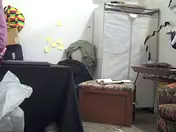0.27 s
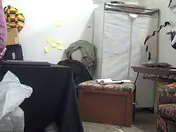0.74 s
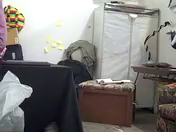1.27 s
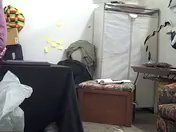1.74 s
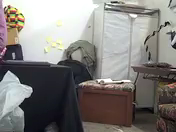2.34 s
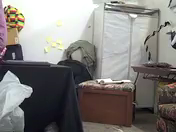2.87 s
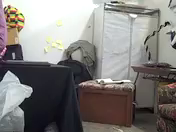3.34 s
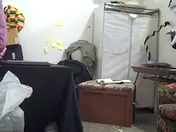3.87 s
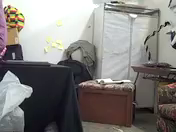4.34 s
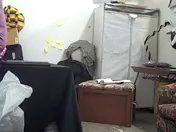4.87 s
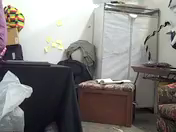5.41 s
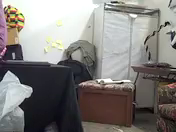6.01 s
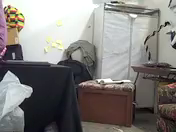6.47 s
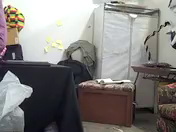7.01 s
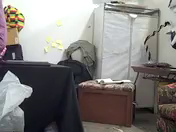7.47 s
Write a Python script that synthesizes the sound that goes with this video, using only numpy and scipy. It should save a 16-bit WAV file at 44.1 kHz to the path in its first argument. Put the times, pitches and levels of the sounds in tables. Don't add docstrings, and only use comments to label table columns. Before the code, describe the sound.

In a quiet cluttered room, someone unseen knocks on wood at irregular intervals. The first knocks are dull, as if round a corner; later ones are clear, hard and snappy. Every blow has a woody ring, a low thump, a slap off a far wall and a short boomy tail. The camera microphone is distant, band-limited and faintly hissy.

```python
import sys
import numpy as np
from scipy import signal
from scipy.fft import rfft, irfft, next_fast_len
from scipy.io import wavfile
from scipy.ndimage import uniform_filter1d

SR = 44100
rng = np.random.default_rng(int(sys.argv[2]) if len(sys.argv) > 2 else 0)


def transcribe(u):
    v = np.clip(np.atleast_2d(u).T, -1, 1)
    q = np.round(v * 32767).astype(np.int16)
    wavfile.write(sys.argv[1], SR, q)


def boost(x):
    u = np.asarray(x, float) / 20
    return 10 ** u


N = 341334
LENGTH = 3 * SR // 4

# [f/Hz, level/dB per Hz]
CORNER_ROOM = [(29, -69), (50, -15), (71, -16), (167, -5), (201, -4.5), (253, -15), (390, -16.5),
               (480, -12), (619, -8), (2770, -25), (4460, -21.5), (6490, -30.5), (7200, -42), (9360, -69.5),
               (15800, -120)]


def unit(x):
    return x / np.sqrt(np.mean(x ** 2) + 1e-20)


def along(points, hz):
    f, v = np.transpose(points)
    return np.interp(np.log(hz + 1), np.log(f + 1), v)


def filtered(x, response):
    m = next_fast_len(len(x) + 4096)
    hz = np.fft.rfftfreq(m, 1 / SR)
    return irfft(rfft(x, m) * response(hz), m)[:len(x)]


def swell(t, peak_s, rise_s, fall_s):
    return np.exp(np.where(t < peak_s, (t - peak_s) / rise_s, (peak_s - t) / fall_s))


def hiss():
    # [f/Hz, level/dB per Hz]
    hiss_spectrum = [(15, -47), (25, -6.5), (32, -6.5), (92, -12.5), (179, -2), (400, -18.5), (571, -9.5),
                     (627, -10.5), (814, -12), (916, -9.5), (1160, -13.5), (1370, -12), (3800, -23.5),
                     (6550, -30), (7200, -42), (9360, -75), (15800, -120)]
    z = signal.stft(rng.standard_normal(N), nperseg=512)[2]
    patches = uniform_filter1d(rng.standard_normal(z.shape), 5, 0)
    patches = uniform_filter1d(patches, 12, 1)
    noise = signal.istft(z * boost(0.9 * unit(patches)), nperseg=512)[1][:N]
    level_db = -51.5
    return boost(level_db) * unit(filtered(noise, lambda hz: boost(along(hiss_spectrum, hz))))


def dying(spectrum, early_db, late_db):
    # [f/Hz, t60/s]
    early_t60 = [(80, 0.05), (500, 0.098), (2000, 0.4), (6000, 0.057)]
    # [f/Hz, t60/s]
    late_t60 = [(80, 1), (200, 0.94), (560, 0.48), (1200, 0.55), (1800, 0.53), (2250, 0.68), (2800, 0.61),
                (4500, 0.57), (7000, 0.52)]
    noise = rng.standard_normal(LENGTH)
    noise = unit(filtered(noise, lambda hz: boost(along(spectrum, hz))))
    hz, t, z = signal.stft(noise, SR, nperseg=256)
    early = boost(early_db - 60 * t / along(early_t60, hz)[:, None])
    late = boost(late_db - 60 * t / along(late_t60, hz)[:, None])
    return signal.istft(z * np.hypot(early, late), SR, nperseg=256)[1][:LENGTH]


def ticks():
    # [t/s, level/dB]
    touches = [
        (0.057, -55),
        (0.5988, -46.5),
    ]
    out, t = np.zeros(N + LENGTH), np.arange(LENGTH) / SR
    for s, db in touches:
        touch = dying(CORNER_ROOM, db - 1.0, db - 14) * (1 - np.exp(-t / 0.0045))
        out[round(s * SR):][:LENGTH] += touch
    return out[:N]


def crack(t, start_hz, end_hz, sweep_s, rise_s):
    # [delay/s, level/dB]
    near_walls = [
        (.008, -6.5),
        (0.015, -16),
        (0.0264, -22.5),
    ]
    turns = end_hz * t + (start_hz - end_hz) * sweep_s * (1 - np.exp(-t / sweep_s))
    sweep = np.sin(2 * np.pi * turns) * swell(t, 3 * rise_s, rise_s, fall_s=0.0042)
    sweep *= np.clip((0.007 - t) / 0.001, 0, 1)
    out = sweep.copy()
    for s, db in near_walls:
        out += boost(db + rng.normal(0, 1.0)) * np.roll(sweep, round(s * SR))
    return out


def panel_ring(t, modes, lead_s, rest_s, rest_db):
    ring = np.zeros(LENGTH)
    for hz, level_db, t60, delay in modes:
        u = np.maximum(t - lead_s - delay, 0)
        strength = boost(level_db + 2.2 * rng.normal() - 60 * u / t60)
        tone = np.sin(-2 * np.pi * hz * rng.normal(1, 0.0084) * u)
        ring += strength * tone * (1 - np.exp(-u * hz / 0.99))
    return ring * boost(rest_db / (1 + np.exp((rest_s - t) / 0.0015)))


def floor_thump(t, thumps):
    out = np.zeros(LENGTH)
    for delay, level_db in thumps:
        out -= boost(level_db + rng.normal(0, 1.5)) * np.exp(-((t - delay) / 0.00025) ** 2)
    return out


def room_answer(t, usual, fresh, rise_s, lag_s, shade, slap_s):
    answer = (0.9 * usual + 0.44 * fresh) * (1 - np.exp(-(t / rise_s) ** 2))
    answer = filtered(answer, lambda f: np.exp(-2j * np.pi * lag_s * 300 * np.log(1 + f / 300)))
    treble = filtered(answer, lambda f: f ** 4 / (f ** 4 + 1600 ** 4))
    return answer - shade * np.exp(-(t / slap_s) ** 4) * treble


def far_wall_slap(t, slap_db, spread_db, slap_s):
    # [f/Hz, width/Hz, level/dB]
    resonances = [(3070, 98, 8.5), (3280, 110, 6.5), (3540, 260, 3), (4730, 240, 3), (4750, 130, -9.5),
                  (2225, 410, -15)]

    def wall(f):
        response = boost(spread_db) * np.exp(-(np.log(f / 4000 + 1e-6) / 0.5) ** 2)
        for k, (centre, width, db) in enumerate(resonances):
            peak = 1j * f * width / (centre * centre - f * f + 1j * f * width)
            response = response + (-1) ** k * boost(db) * peak
        return response

    burst = unit(filtered(rng.standard_normal(LENGTH), wall))
    return boost(slap_db) * swell(t, slap_s, rise_s=0.011, fall_s=0.0014) * burst


def room_boom(t, boom_db, boom_s):
    u = np.maximum(t - boom_s, 0)
    tone = np.sin(2 * np.pi * 205 * rng.normal(1, 0.065) * u)
    return boost(boom_db - 60 * u / 0.14) * tone * (1 - np.exp(-u / 0.0013))


def knocks(blows, edge, modes, room, thumps, before_s, lead_s, crack_db, crack_hz, ring_db, rest_s, rest_db,
           shade, early_db, late_db, rise_s, lag_s, slap_db, spread_db, slap_s, boom_db, boom_s):
    colour_hz = [110, 290, 700, 2200, 5000]
    out, t = np.zeros(N + LENGTH), np.arange(LENGTH) / SR
    usual = dying(room, early_db, late_db)
    for s, db, bass_db, treble_db in blows:
        edge_db = edge[0] + edge[1] * treble_db
        ring = panel_ring(t, modes, lead_s, rest_s, rest_db)
        start_hz = crack_hz * rng.normal(1, 0.053)
        first = boost(crack_db) * crack(t, start_hz, 0.34 * crack_hz, sweep_s=0.00506, rise_s=0.00034)
        thump = floor_thump(t, thumps)
        fresh = dying(room, early_db, late_db)
        answer = room_answer(t, usual, fresh, rise_s, lag_s, shade, slap_s)
        slap = far_wall_slap(t, slap_db, spread_db, slap_s)
        boom = room_boom(t, boom_db, boom_s)
        blow = first + boost(ring_db) * ring + thump + answer + boom + slap
        colour = list(zip(colour_hz, [0.36 * bass_db, bass_db, 0, edge_db, treble_db]))
        blow = filtered(blow, lambda f: boost(along(colour, f)) * f ** 2 / (f ** 2 + 75 ** 2))
        out[round((s - before_s) * SR):][:LENGTH] += boost(db) * blow
    return out[:N]


def dull_panel():
    # [t/s, level/dB, weight of the hand as bass/dB, hardness of the knuckle as treble/dB]
    blows = [
        (0.3519, -26, 7.5, 4.5),
        (0.6388, -16.5, 2.5, 1.5),
        (1.23, -11, -1.5, -0.5),
        (1.5386, -10.5, 3.5, 0.1),
        (1.8581, -8.5, 1.5, -2),
        (2.3762, -9.5, -1.5, -1),
    ]
    # [f/Hz, level/dB, t60/s, delay/s]
    modes = [(143.6, -2.5, 0.11, 0.0019), (199, -10.5, 0.033, 0.0045), (248.8, -2.5, 0.098, 0.0035),
             (418, -24, 0.11, 0.0011), (506, -7.5, 0.063, 0.0016), (603, -16, 0.035, 0.00049),
             (640, -32, 0.055, 0.00028), (841, -9.5, 0.23, 0.00011), (990, -15.5, .07, 0.00033),
             (1139, -18.5, 0.27, 0.00023), (1340, -14.5, 0.042, 0.00095)]
    # [delay/s, level/dB]
    thumps = [
        (.0113, -8),
    ]
    return knocks(blows, (2.7, 1.53), modes, CORNER_ROOM, thumps, before_s=0.005, lead_s=0.003075,
                  crack_db=-26, crack_hz=2610, ring_db=-0.5, rest_s=0.017, rest_db=-7.0,
                  shade=0.44, early_db=-12, late_db=-12.0, rise_s=0.0033, lag_s=0.00484,
                  slap_db=-14, spread_db=-5.0, slap_s=0.0384, boom_db=-15.0, boom_s=0.088)


def hard_panel():
    # [t/s, level/dB, weight of the hand as bass/dB, hardness of the knuckle as treble/dB]
    blows = [
        (3.0195, -12, 1.5, 4),
        (3.3245, -10.5, -0.5, 2),
        (3.7817, -24.5, 12, -1),
        (4.1603, -10.5, -3.5, 3),
        (4.421, -9.5, -6, 5.5),
        (4.6758, -10.5, -3, 4.5),
        (5.963, -9, -3.3, 5),
        (6.3555, -13.5, -2.5, 14.5),
        (6.7965, -14.5, 0.5, 9.5),
        (7.257, -14.5, 4, 12),
    ]
    # [f/Hz, level/dB, t60/s, delay/s]
    modes = [(147.3, -14.5, 0.32, 0.0094), (206, -20, 0.049, 0.01), (274.3, 2.5, 0.078, 0.01017),
             (486, -20.5, 0.066, 0.0072), (657, -15.5, 0.11, 0.00655), (772, -12.5, 0.3, 0.0055),
             (1007, -3, 0.064, 0.00397), (1140, -9.5, 0.14, .004), (1310, -19, 0.062, 0.00325),
             (1466, -12.5, 0.07, 0.00321), (1488, -17, 0.091, 0.00298), (1720, -27, 0.054, .002),
             (1916, -22, .2, 0.00056), (2420, -22.5, 0.45, 0.0012), (2626, -19.5, 0.14, 0.001397)]
    # [f/Hz, level/dB per Hz]
    room = [(29, -56.5), (50, -12.5), (73, -20), (197, -2), (258, -12.5), (293, -8), (400, -17.5),
            (513, -9.5), (1750, -15.5), (2250, -14.5), (2850, -20.5), (6500, -35.5), (7200, -46),
            (9360, -82.5), (15800, -120)]
    # [delay/s, level/dB]
    thumps = [
        (.0105, 1.5),
        (.0112, 2.5),
        (.016, -3),
    ]
    return knocks(blows, (-5, 0.68), modes, room, thumps, before_s=0.0006, lead_s=0.00046,
                  crack_db=-4.5, crack_hz=2742, ring_db=-3.0, rest_s=0.021, rest_db=-3.5,
                  shade=0.035, early_db=-12.0, late_db=-12.0, rise_s=0.0016, lag_s=0.00578,
                  slap_db=-21.5, spread_db=-6.0, slap_s=0.04, boom_db=-14.5, boom_s=0.065)


def scene():
    return (hiss() + ticks() + dull_panel() + hard_panel())[None]


def low_pass(x):
    return signal.sosfilt(signal.butter(12, 7440, fs=SR, output="sos"), x)


def record(dry):
    # [f/Hz, level/dB]
    band_limits = [(30, -14), (70, -5), (120, -2.33), (6800, -0.85), (7100, -22), (7500, -39.5),
                   (7800, -130)]
    narrow = filtered(dry[0], lambda hz: boost(along(band_limits, hz)))
    return low_pass(narrow[None])


dry = scene()
out = record(dry)
transcribe(out)
```